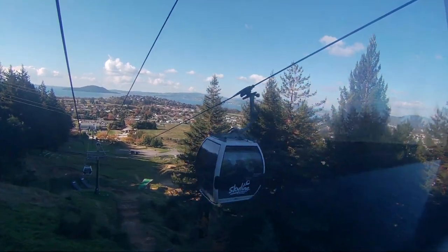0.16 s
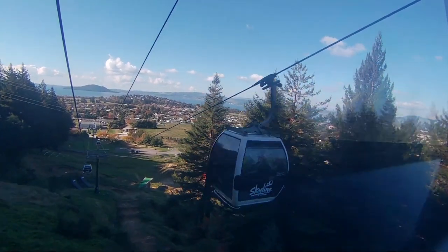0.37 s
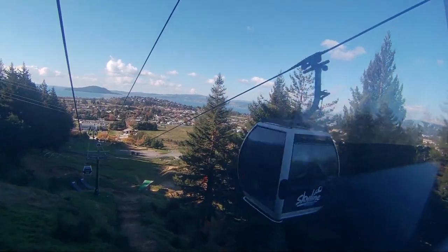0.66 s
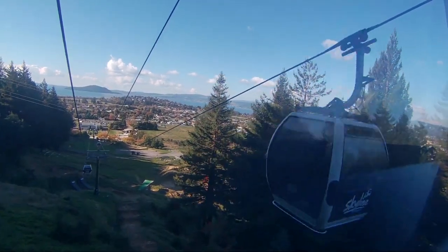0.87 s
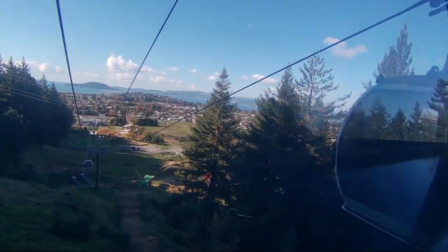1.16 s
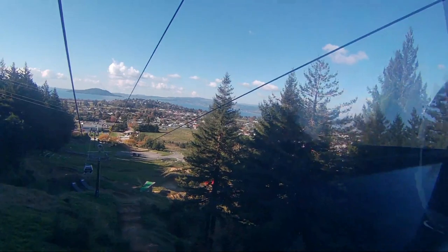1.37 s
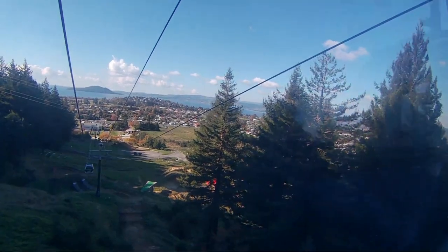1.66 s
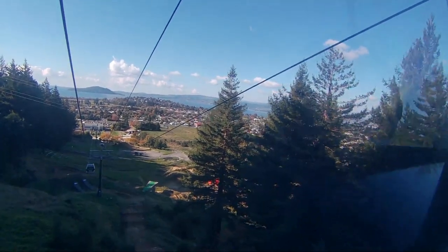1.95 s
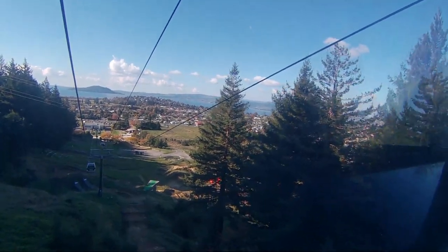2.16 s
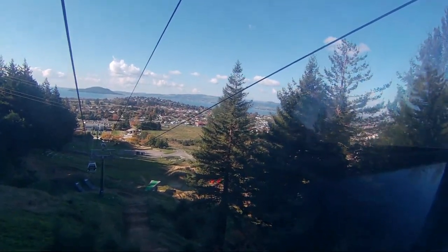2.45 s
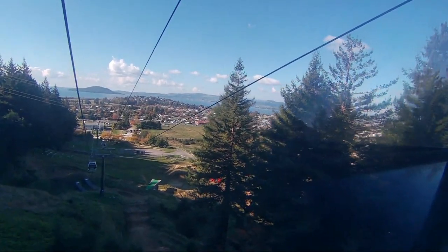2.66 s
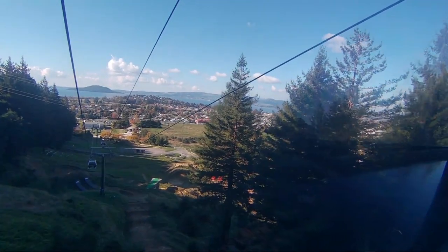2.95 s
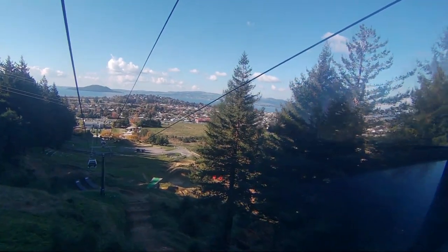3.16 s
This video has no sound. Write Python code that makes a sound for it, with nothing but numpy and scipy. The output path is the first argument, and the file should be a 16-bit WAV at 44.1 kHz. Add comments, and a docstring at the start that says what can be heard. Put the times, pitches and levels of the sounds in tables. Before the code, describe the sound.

Inside a small cable car cabin, a low rumble and frame rattle swell quickly; a loose part near the microphone begins knocking regularly, with one bright click, before the shaking dies into near silence.

```python
"""Inside a cable car cabin while its running gear is jolted about ten times a second along the rope.
First the jolts, impact noise through resonators, rattle the metal frame and boom in the cabin's low modes.
Small bright fittings tick along; then a loose part near the microphone knocks and rebounds as struck
decaying modes, once with a sharp click of quick contacts. Last, the shaking dies away into faint hiss."""
import sys
import numpy as np
from scipy import signal
from scipy.fft import rfft, irfft, next_fast_len
from scipy.io import wavfile
from scipy.ndimage import uniform_filter1d

SR = 44100
rng = np.random.default_rng(int(sys.argv[2]) if len(sys.argv) > 2 else 0)


def output_pcm(signal):
    """Save a mono or channel-first signal as 16-bit PCM at the path in sys.argv[1].

    Samples are clipped to [-1, 1] before scaling.
    """
    pcm = np.clip(np.atleast_2d(signal).T, -1, 1) * 32767
    wavfile.write(sys.argv[1], SR, np.round(pcm).astype(np.int16))


def ratio(d):
    """dB to gain"""
    e = np.asarray(d, float) / 20
    return 10 ** e


N = 145530

# Jolts that shake the frame. Each row: start in seconds, level in dB, treble relative to it in dB,
# hold in seconds.
FRAME_JOLTS = [(.0004, -46.5, 0, 0.0033), (0.05, -51, 1, 0.028), (0.098, -44, -1.5, 0.014),
               (0.208, -46.5, -2.5, 0.028), (0.277, -48.5, -0.5, 0.026), (0.33, -36.5, 3.5, 0.022),
               (0.439, -36.5, 4.5, 0.018), (0.546, -35, 7.5, 0.024), (0.659, -34.5, 4, 0.028),
               (0.784, -34, 4.5, 0.022), (.886, -40.5, 2, 0.03), (0.976, -38.5, -3, 0.0081),
               (0.99, -34.5, 3.5, 0.025), (1.104, -32.5, 4, 0.025), (1.229, -37.5, 3.5, 0.013),
               (1.32, -45, -1, 0.047), (1.458, -44.5, 2, 0.029), (1.559, -41, 4, .03),
               (1.702, -50, 5, 0.011), (1.742, -43.5, 1.5, 0.038), (1.935, -41.5, 2.5, 0.018),
               (2.049, -44, 1.5, 0.036), (2.149, -49, 1, 0.023), (2.256, -38, 4.5, 0.026),
               (2.363, -38.5, 4.5, 0.035), (2.478, -42.5, 2.5, 0.023), (2.559, -49, -3, 0.044),
               (2.67, -50.5, -0.5, 0.024), (2.790, -69, 4, 0.015), (2.911, -68, 0, 0.02)]
# Steady drumming of cabin and frame, before the offsets of each source. Each row: time in seconds,
# bass level in dB, frame level in dB, upper frame level in dB.
DRUMMING = [(0.0, -38.5, -50, -53), (0.26, -45.5, -56.5, -64.5), (0.39, -31.5, -45, -44),
            (0.49, -28.5, -46.5, -45.5), (0.56, -24, -43, -47), (0.85, -36.5, -48, -47),
            (0.96, -28, -45, -45.5), (1.19, -28.5, -46, -45), (1.41, -33.5, -52, -55.5),
            (1.55, -31.5, -49.5, -55), (1.65, -45.5, -64, -67), (1.81, -34, -47.5, -51),
            (1.95, -37, -59.5, -65), (2.03, -33, -52.5, -59), (2.17, -38, -53.5, -60),
            (2.45, -35, -47, -49.5), (2.56, -35.5, -52, -52.5), (2.7, -44, -60, -69.5),
            (2.85, -46.5, -70.5, -82.5), (3.0, -48.5, -71.5, -86.5), (3.15, -59.5, -81.5, -87),
            (3.3, -69, -84, -98)]
# Spectrum of the frame's broad rattle. Each row: frequency in Hz, relative level in dB.
FRAME_SPECTRUM = [(220, -9.5), (380, -14.5), (543, 7), (663, 2.5), (850, -5.5), (1050, -3), (1190, 0.5),
                  (1390, 3.5), (1610, -6.5), (1840, -3.5), (2050, -11), (2500, -16.5), (2800, -16),
                  (3150, -27), (3550, -29.5), (3850, -38.5), (4290, -26), (4800, -35.5), (5150, -28),
                  (6000, -62), (7000, -59.5), (8000, -74.5), (11000, -75), (20000, -120)]
# Pitches of the frame's modes, in Hz.
FRAME_PITCHES = [430, 489, 553, 604, 672, 721, 765, 1158, 1190, 1251, 1364, 1416, 1504, 1615, 1694, 1755,
                 1845, 2000, 2105, 2196, 2493, 2690, 3593, 4450]
# Ringing of those modes. Each row: relative level in dB, t60 in seconds.
FRAME_RINGING = [(0, 0.28), (4, 0.9), (-1.5, .25), (0, 0.9), (8.5, 0.2), (-4.5, 0.09), (-12.5, 0.1),
                 (-8.5, 0.29), (3.5, 0.6), (6.5, 0.33), (3.5, .2), (-3, 0.11), (0.5, 0.36), (-5.5, 0.13),
                 (3, 0.14), (-11, 0.1), (-4.5, 0.16), (-9, 0.1), (-7.5, 0.11), (-10, 0.097), (-12, 0.22),
                 (-9.5, .1), (-23.5, 0.044), (-13.5, .025)]
# Share of the treble envelope, 0 to 1, in each frame band from 1000 Hz up.
TREBLE_SHARES = [0, .45, .6, 1, 1]
# Booms in the cabin. Each row: start in seconds, level in dB, hold in seconds,
# lowest modes relative to the level in dB.
CABIN_BOOMS = [(0.054, -39, 0.0056, -6), (0.192, -34, 0.022, 3.5), (0.22, -21.5, 0.014, -10),
               (0.297, -15.5, 0.011, -7), (0.34, -15.5, 0.0054, -4), (0.401, -22, 0.04, -11.5),
               (0.448, -27.5, 0.0069, 0), (0.515, -31, 0.053, -16.5), (0.566, -12, 0.0085, 1),
               (0.627, -22, 0.028, -14), (0.703, -17.5, 0.0085, -8.5), (0.792, -15.5, 0.011, -3),
               (0.855, -12.5, 0.013, -10.5), (0.977, -20, 0.03, -11), (1.061, -11.5, 0.0099, -2.5),
               (1.108, -15.5, 0.018, -36), (1.168, -36, 0.017, 2), (1.242, -9, 0.0053, -0.5),
               (1.306, -31.5, 0.053, 0.5), (1.367, -30, 0.02, -5), (1.464, -14.5, 0.013, -4),
               (1.511, -44, 0.11, -5), (1.611, -27, 0.02, -16), (1.725, -22, 0.0054, 13),
               (1.82, -18.5, 0.0047, 11), (1.907, -20, 0.0067, 0.5), (2.029, -27.5, 0.019, 1),
               (2.098, -37, 0.021, 11), (2.168, -34, 0.0062, 7), (2.26, -37, 0.0097, 15),
               (2.314, -35, 0.059, 1), (2.364, -22.5, 0.017, 5), (2.448, -19.5, 0.018, -4.5),
               (2.518, -15.5, 0.0064, -21), (2.594, -27.5, 0.017, -4.5), (2.772, -38, 0.0067, 15.5),
               (2.808, -39.5, 0.021, -8), (2.908, -28.5, 0.02, -19.5), (2.946, -31, 0.012, -13)]
# Pitches of the cabin's modes, in Hz; the first two are the lowest modes.
CABIN_PITCHES = [80, 118, 168, 222, 245, 290, 348]
# Ringing of those modes. Each row: relative level in dB, t60 in seconds.
CABIN_RINGING = [(2, 0.11), (7.5, 0.068), (-10.5, 0.1), (0.5, 0.12), (-2, 0.13), (-5, 0.1), (-9, 0.14)]
# The cabin's strongest mode. Each row: time in seconds, level in dB.
MAIN_MODE_LEVEL = [(0.0, -43), (0.08, -52), (0.29, -32.5), (0.53, -34.5), (0.88, -37.5), (0.9, -47),
                   (1.04, -27), (1.09, -44), (1.24, -36), (1.26, -30.5), (1.36, -44), (1.41, -38),
                   (1.56, -41), (1.63, -33.5), (1.67, -41.5), (1.83, -42), (1.86, -43.5), (2.15, -45),
                   (2.18, -49), (2.53, -39.5), (2.59, -57), (2.64, -42), (2.68, -51), (2.97, -39.5),
                   (3.01, -56.5), (3.3, -64.5)]
# The deepest bass. Each row: time in seconds, level in dB.
SWAY_LEVEL = [(0.0, -61.5), (0.25, -45.5), (0.27, -43), (0.87, -49), (1.02, -39.5), (1.47, -52.5),
              (1.59, -45), (1.67, -56), (1.74, -42.5), (2.21, -56), (2.27, -46.5), (3.3, -64.5)]
# Knocks of the loose part. Each row: start in seconds, strength in dB, treble relative to it in dB,
# rebound as a share of the first push.
PART_KNOCKS = [(1.2829, 1.5, -1, 0.15), (1.5022, 2, 11, 0.27), (1.612, 0.5, 1.5, 0.17),
               (1.7159, -7, -5.5, 0.12), (1.8133, 0.5, 3, 0.27), (1.911, -0.4, -0.5, 0.23),
               (2.0114, 1, 2.5, 0.24), (2.1139, 1.5, 3.5, 0.27), (2.2166, -1, 1.5, 0.39),
               (2.32, -0.5, 1.5, 0.34), (2.4163, -3, 0.5, 0.34), (2.5169, -2, -2.5, 0.097),
               (2.6167, -8, -6, 0.12)]
# Low modes of the loose part. Each row: frequency in Hz, level in dB, t60 in seconds,
# sign of the first swing.
PART_LOW_MODES = [(145, -20, .018, -1), (410, -13, .005, 1), (925, -24, .010, 1), (1170, -33, .025, -1)]
# High modes of the loose part, before each knock's scatter. Each row: frequency in Hz, level in dB,
# t60 in seconds, sign of the first swing.
PART_HIGH_MODES = [(1466, -27.5, 0.002, 1), (1897, -31.5, 0.0033, -1), (2510, -33, 0.011, 1),
                   (2725, -39, 0.0032, -1), (3530, -51, 0.015, -1), (4130, -39, 0.0069, 1),
                   (4340, -36.5, 0.0036, -1), (4850, -44.5, 0.0023, 1), (6800, -56, 0.0024, 1),
                   (9030, -60.5, 0.0088, -1)]
# Contacts within the click. Each row: delay in seconds, signed strength (push +, pull -),
# contact time in seconds.
CONTACTS = [(0, 1, .0005), (.00056, -1.1, .0001), (.00078, .8, .00007), (.0017, -.4, .00008)]
# Low body of the click. Each row: frequency in Hz, level in dB, t60 in seconds, sign of the first swing.
CLICK_BODY = [(155, -11.5, .03, -1), (1240, -11.5, .0095, 1)]
# Bright ringing of the click. Each row: frequency in Hz, level in dB, sign of the first swing.
CLICK_RINGING = [(2620, -23, -1), (3080, -16, -1), (4000, -21, 1), (4540, -11, 1), (6860, -32.5, 1),
                 (7400, -34, 1), (8180, -31.5, 1), (9630, -16.5, 1), (11800, -25, 1), (12570, -21.5, -1),
                 (15000, -17.5, 1)]
# Decay of each bright click mode: t60 in seconds.
CLICK_DECAY = [.005, .003, .003, .004, .004, .004, .004, .003, .003, .003, .002]
# Ticks and rattles of brighter fittings. Each row: start in seconds, level in dB, hold in seconds.
FITTING_RATTLES = [(0.405, -62, 0.005), (0.519, -63.5, 0.0078), (0.633, -59, 0.0041), (0.861, -65, 0.0082),
                   (1.075, -58, 0.0075), (1.44, -72, .002), (1.543, -57, 0.0017), (1.649, -64, 0.0021),
                   (1.702, -71, 0.002), (1.799, -59, 0.0018), (1.839, -78, 0.013), (1.999, -63, .002),
                   (2.103, -63, 0.0015), (2.21, -75, 0.0027)]
# Hiss of the microphone. Each row: time in seconds, level between 9 and 15 kHz in dB.
HISS_LEVEL = [(0.0, -83), (0.56, -80), (2.51, -80.5), (3.3, -85.5)]


def frame():
    """Filtered impact noise: jolts and drumming excite the frame, with a treble envelope of its own."""
    start, db, treble_db, hold = np.array(FRAME_JOLTS).T
    impacts = clatter(rate_hz=4000, spread_db=1.2)
    bands = even(impacts, [250, 550, 1000, 1550, 2200, 3200, 5200, 12000], smooth_s=.03)

    jolts = shaking(start, db, hold, rise_s=.0022, fall_s=.026)
    treble_jolts = shaking(start, db + treble_db, hold, rise_s=.002, fall_s=.019)
    upper_drum = curve(DRUMMING, column=3)
    low = np.hypot(jolts, curve(DRUMMING, column=2))
    mid = np.hypot(jolts, ratio(-3) * upper_drum)
    high = np.hypot(treble_jolts, ratio(1) * upper_drum)

    shaken = sum(bands[:2]) * low
    for part, share in zip(bands[2:], TREBLE_SHARES):
        shaken = shaken + part * mid ** (1 - share) * high ** share

    modes = tuned(FRAME_PITCHES, FRAME_RINGING)

    def broad_body(x):
        return colour(x, FRAME_SPECTRUM)

    def ringing_body(x):
        return band(ring(x, modes), 430, 4400)

    steady = sum(bands)
    return respond(broad_body, shaken, steady) + ratio(-6) * respond(ringing_body, shaken, steady)


def cabin():
    """Room resonance: booms and drumming excite the low modes; the deepest bass sways on its own."""
    start, db, hold, low_db = np.array(CABIN_BOOMS).T
    drum = curve(DRUMMING, column=1)
    boom_noise, sway_noise = rng.standard_normal((2, N))
    bands = even(boom_noise, [60, 98, 132, 160, 195, 234, 267, 320, 450], smooth_s=.06)
    modes = tuned(CABIN_PITCHES, CABIN_RINGING)

    def envelope(boom_db, drum_db):
        return np.hypot(shaking(start, boom_db, hold, rise_s=.023, fall_s=.0044), ratio(drum_db) * drum)

    def lowest_body(x):
        return band(ring(x, modes[:2]), 88, 120)

    def upper_body(x):
        direct = ratio(29.5) * band(x, 160, 320)
        return band(ring(x, modes[2:]) + direct, 150, 339.7, order=3)

    def main_body(x):
        return ring(x, [(146, 0, .12)])  # Hz, dB, t60 in seconds

    low_drive, main_drive, upper_drive = sum(bands[:2]), bands[2], sum(bands[3:])
    lowest = respond(lowest_body, low_drive * envelope(db + low_db, -6), low_drive)
    upper = respond(upper_body, upper_drive * envelope(db - 3, -6.5), upper_drive)
    main = respond(main_body, main_drive * curve(MAIN_MODE_LEVEL), main_drive)
    sway = curve(SWAY_LEVEL) * unit(band(sway_noise, 17, 58, order=3))
    return lowest + upper + main + sway


def loose_part():
    """Modal impact: each push and opposite rebound rings the part, its high modes varying by knock."""
    rebound_s, push_s = .00155, .00022
    chatter_s, chatter_share = .004, .088  # small after-contacts
    scatter_db, detune = 1.6, .012  # largest change of mode level, and of pitch as a share
    dull = np.zeros(N)
    for start, db, _, rebound in PART_KNOCKS:
        dull += ratio(db) * (blow(start, push_s) - rebound * blow(start + rebound_s, push_s))
    out = ring(dull, PART_LOW_MODES)

    chances = rng.uniform(-.86, 1, (len(PART_KNOCKS), 24))
    for (start, db, treble_db, rebound), chance in zip(PART_KNOCKS, chances):
        chatter = 0
        for k, c in enumerate(chance[:3]):
            late = 2 * rebound_s + abs(c) * chatter_s / 2 + k * chatter_s / 4
            chatter = chatter + np.sign(c) * blow(start + late, .00012) / (k + 1)
        pushes = blow(start, .00008) - rebound * blow(start + rebound_s, push_s)
        bright = ratio(db + treble_db) * (pushes + chatter_share * chatter)

        modes = []
        for (hz, mode_db, t60, swing), a, b in zip(PART_HIGH_MODES, chance[3:], chance[13:]):
            modes.append((hz * (1 + detune * a), mode_db + scatter_db * b, t60, swing))
        span = slice(int(start * SR), int((start + .05) * SR))
        out[span] += ring(bright[span], modes)
    return out + click()


def click():
    """Modal impact: a quick train of short contacts rings a low body and bright modes."""
    start = 1.3976  # seconds
    contacts = sum(size * blow(start + late, push_s) for late, size, push_s in CONTACTS)
    bright = [(hz, db, t60, swing) for (hz, db, swing), t60 in zip(CLICK_RINGING, CLICK_DECAY)]
    return ring(contacts, list(CLICK_BODY) + bright)


def fittings():
    """Small-body resonance: brief bursts of impacts ring a few bright modes."""
    start, db, hold = np.array(FITTING_RATTLES).T
    impacts = clatter(rate_hz=9000, spread_db=2.5)
    # Hz, dB, t60 in seconds, sign of the first swing
    modes = [(3000, -15.5, .0047, 1), (3450, .5, .012, -1), (4120, 2.5, .015, 1), (4540, .5, .0061, -1)]

    def body(x):
        return band(ring(x, modes), 1500, 6400, order=4)

    return respond(body, impacts * shaking(start, db, hold, rise_s=.001, fall_s=.003), impacts)


def microphone_hiss():
    """Stationary random noise, gently coloured, under a slowly changing level."""
    tint = [(20, 1.5), (1000, 6.5), (4000, 3), (10000, 2.5), (16000, 1.5)]  # Hz, dB
    hiss = colour(rng.standard_normal(N), tint)
    hiss = hiss / np.std(band(hiss, 9000, 15000, order=4))
    return curve(HISS_LEVEL) * hiss


def clatter(rate_hz, spread_db):
    """Random impact process: dense hits of uneven size over a little noise, at rms 1."""
    struck = rng.random(N) < rate_hz / SR
    sizes = rng.standard_normal(N) * ratio(spread_db * rng.exponential(size=N))
    return unit(unit(struck * sizes) + .5 * rng.standard_normal(N))


def even(x, edges_hz, smooth_s):
    """Unbroken rolling contact: bands of x between the edges, each held at a steady strength."""
    size = int(smooth_s * SR)
    parts = []
    for lo_hz, hi_hz in zip(edges_hz, edges_hz[1:]):
        part = band(x, lo_hz, hi_hz)
        strength = np.sqrt(uniform_filter1d(part ** 2, size, mode="mirror") + 1e-18)
        parts.append(part * np.std(part) / strength)
    return parts


def blow(start, push_s):
    """Impulse of a contact: one half-sine push whose samples sum to 1."""
    phase = (np.arange(N) / SR - start) / push_s
    push = np.sin(np.pi * np.clip(phase, 0, 1))
    return push / push.sum()


def shaking(starts, dbs, holds, rise_s, fall_s):
    """Exponential build-up, hold and decay of each shake; overlapping shakes add in power."""
    t, power = np.arange(N) / SR, np.zeros(N)
    for start, db, hold in zip(starts, dbs, holds):
        span = slice(int(start * SR), int((start + .3) * SR))
        since = t[span] - start
        rise = 1 - np.exp(-np.maximum(since, 0) / rise_s)
        fall = np.exp(-np.maximum(since - max(hold, 0), 0) / fall_s)
        power[span] += (ratio(db) * rise * fall) ** 2
    return np.sqrt(power)


def ring(x, modes):
    """Modal superposition: x excites a bank of exponentially decaying sines."""
    out = 0
    for hz, db, t60, *swing in modes:
        r = np.exp(-np.log(1000) / (max(t60, 1e-3) * SR))
        w = 2 * np.pi * hz / SR
        gain = np.sign(swing[0] if swing else 1) * ratio(db)
        out = out + gain * signal.lfilter([0, r * np.sin(w)], [1, -2 * r * np.cos(w), r * r], x)
    return out


def tuned(pitches, ringing):
    """Normal modes: joins each pitch with its level and decay."""
    return [(hz, *mode) for hz, mode in zip(pitches, ringing)]


def respond(body, shaken, steady):
    """Linear response of a body to the shaken drive, scaled by its rms response to the steady one."""
    return body(shaken) / np.sqrt(np.mean(body(steady) ** 2))


def colour(x, points):
    """Spectral shaping through (Hz, dB) points, interpolated over log frequency."""
    corners, size = np.array(points, float), next_fast_len(N + SR // 10)
    hz = np.maximum(np.arange(size // 2 + 1) * SR / size, 1)
    gain = ratio(np.interp(np.log(hz), np.log(corners[:, 0]), corners[:, 1]))
    return irfft(rfft(x, size) * gain, size)[:N]


def band(x, lo_hz, hi_hz, order=2):
    """Band-pass filtering with a Butterworth response."""
    return signal.sosfilt(signal.butter(order, [lo_hz, hi_hz], "band", fs=SR, output="sos"), x)


def curve(table, column=1):
    """Amplitude envelope: gain along time, interpolated in dB from a column."""
    rows = np.array(table, float)
    return ratio(np.interp(np.arange(N) / SR, rows[:, 0], rows[:, column]))


def unit(x):
    """Power normalisation to rms 1."""
    return x / np.sqrt(np.mean(x ** 2))


def scene():
    """Superposition of all sources at one microphone."""
    return (frame() + cabin() + loose_part() + fittings())[None]


def band_limit(x):
    """A steep low-pass at the top of the band."""
    return signal.sosfilt(signal.butter(12, 16750, fs=SR, output="sos"), x)


def record(dry):
    """Soft saturation: the microphone rounds the highest peaks towards a ceiling and adds its hiss."""
    ceiling = .4  # of full scale
    rounded = dry / (1 + (dry / ceiling) ** 4) ** .25
    mix = rounded + microphone_hiss()
    return band_limit(mix)


dry = scene()
out = record(dry)
output_pcm(out)
```